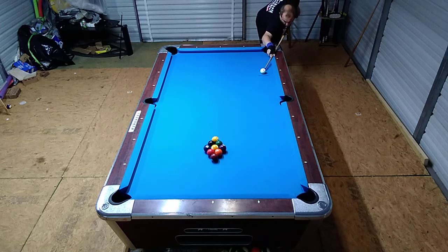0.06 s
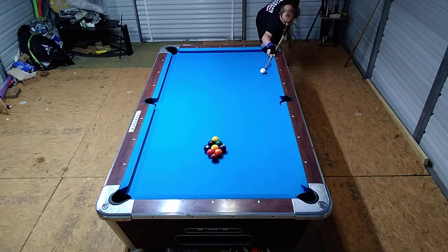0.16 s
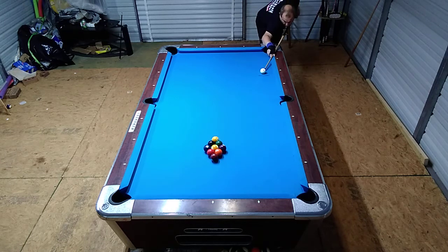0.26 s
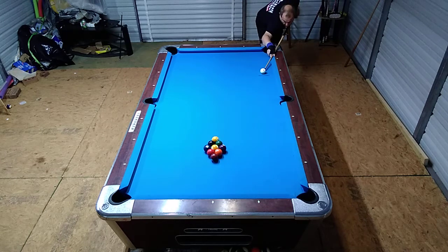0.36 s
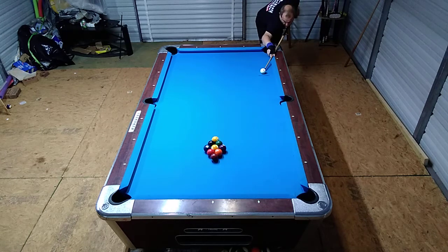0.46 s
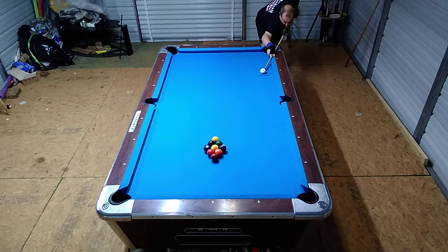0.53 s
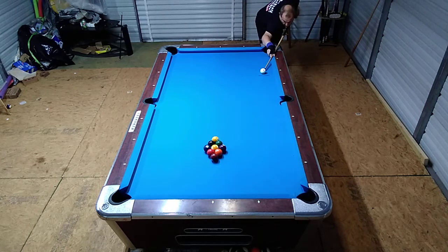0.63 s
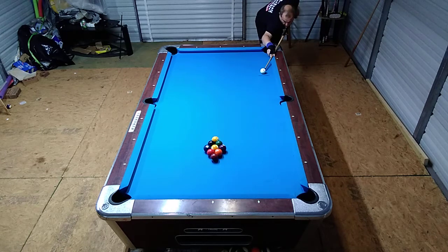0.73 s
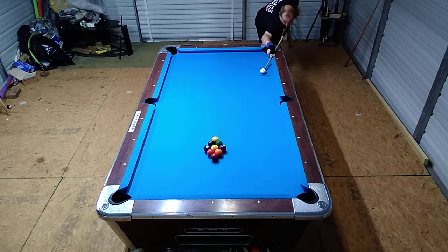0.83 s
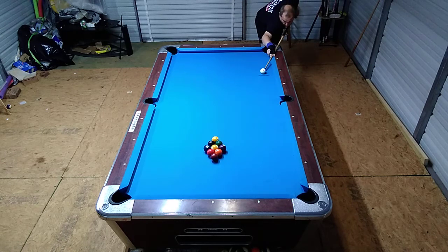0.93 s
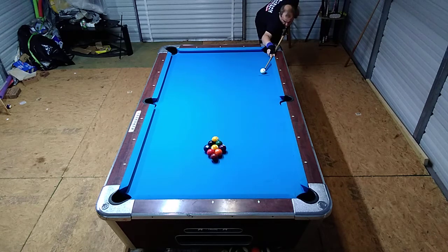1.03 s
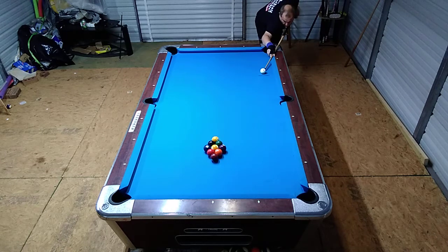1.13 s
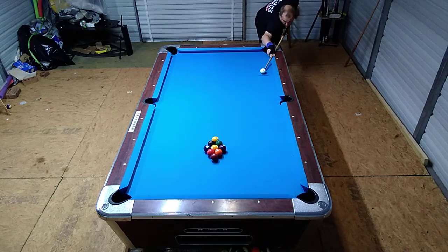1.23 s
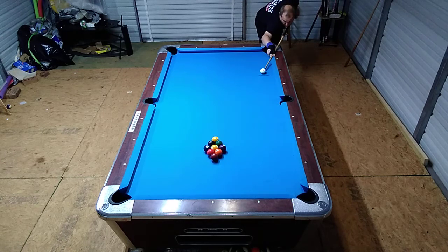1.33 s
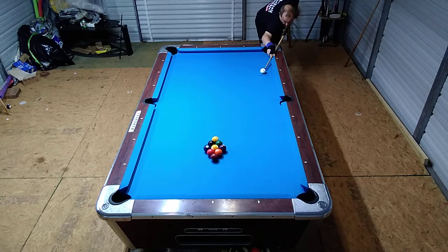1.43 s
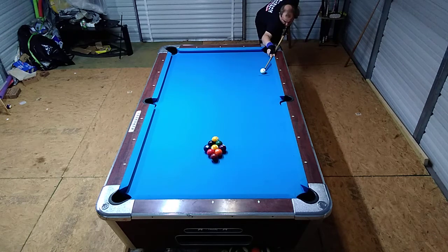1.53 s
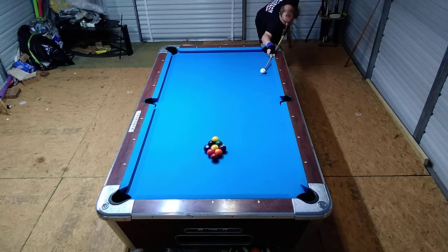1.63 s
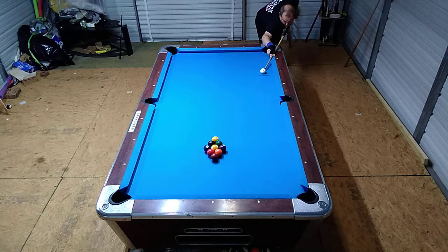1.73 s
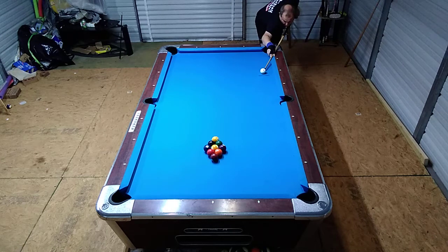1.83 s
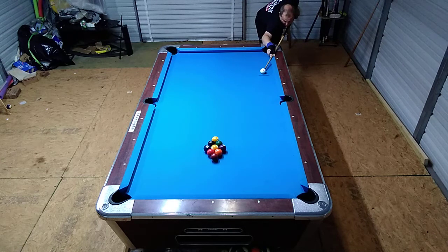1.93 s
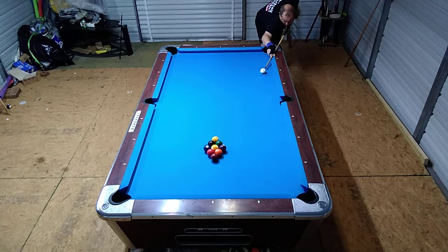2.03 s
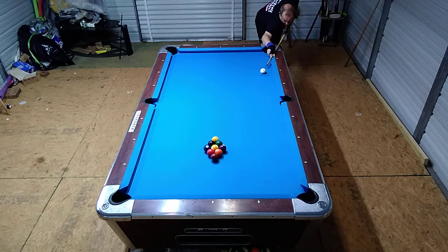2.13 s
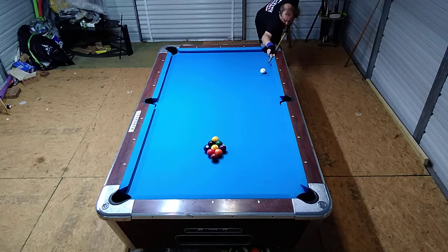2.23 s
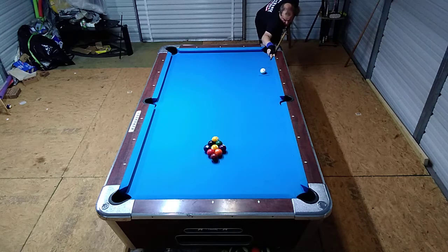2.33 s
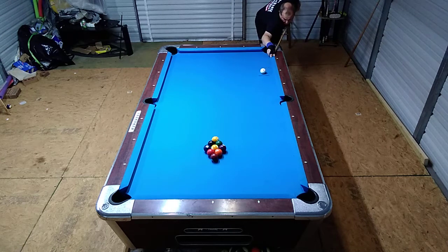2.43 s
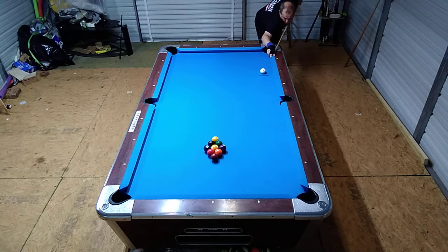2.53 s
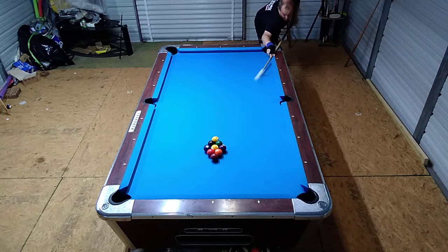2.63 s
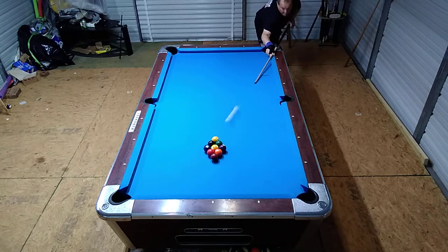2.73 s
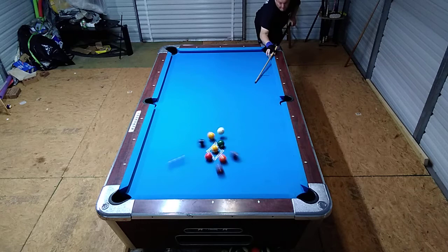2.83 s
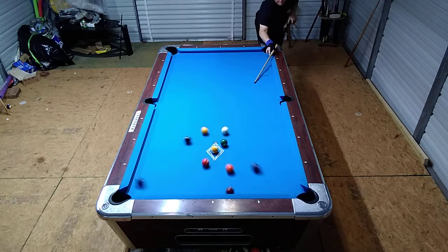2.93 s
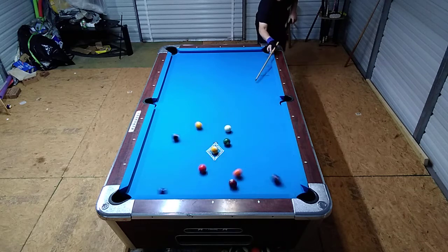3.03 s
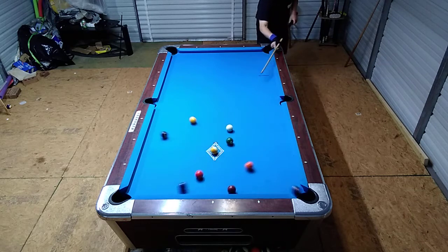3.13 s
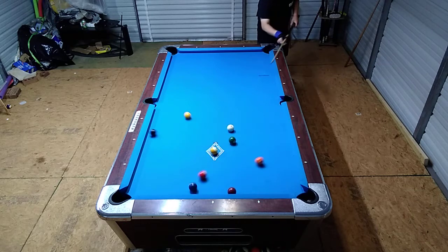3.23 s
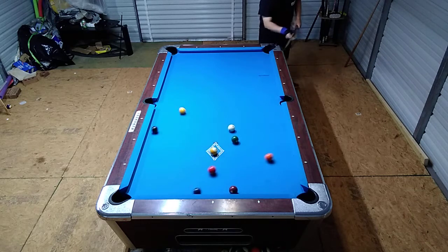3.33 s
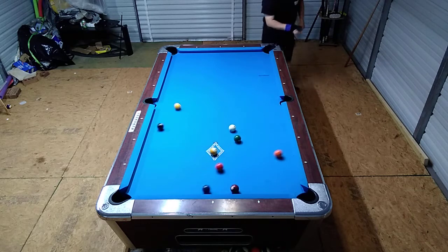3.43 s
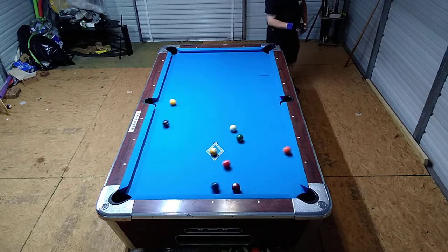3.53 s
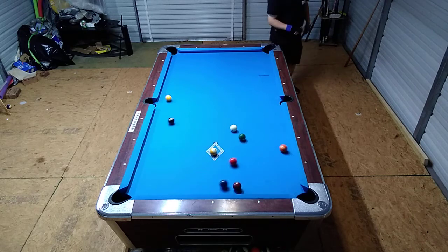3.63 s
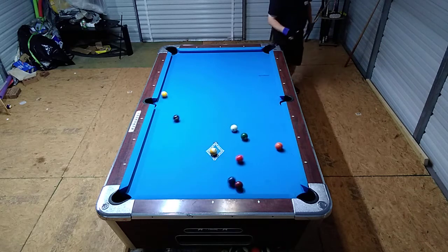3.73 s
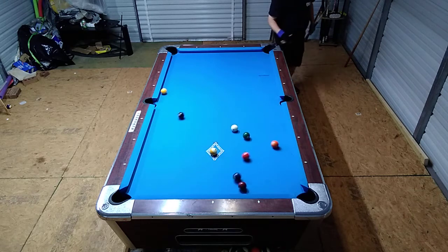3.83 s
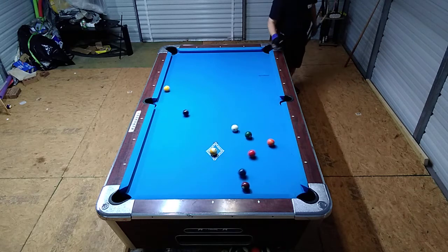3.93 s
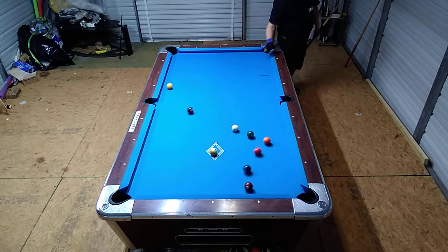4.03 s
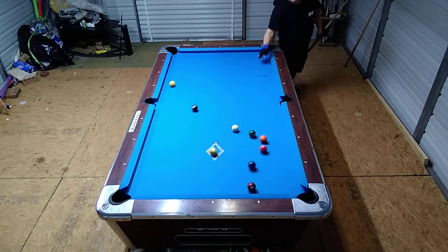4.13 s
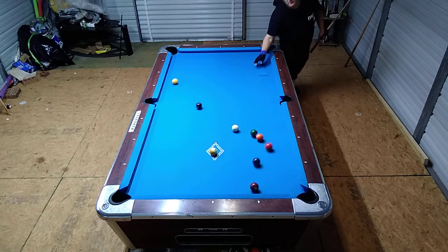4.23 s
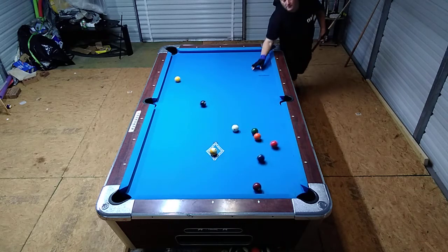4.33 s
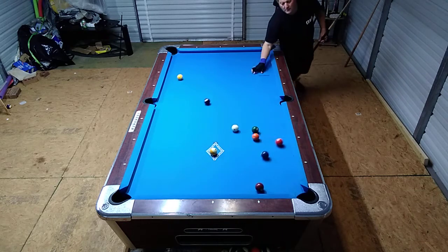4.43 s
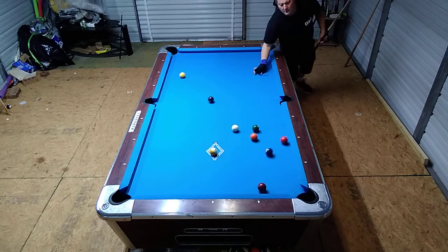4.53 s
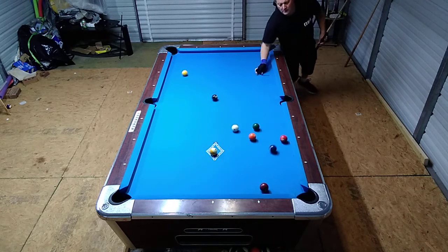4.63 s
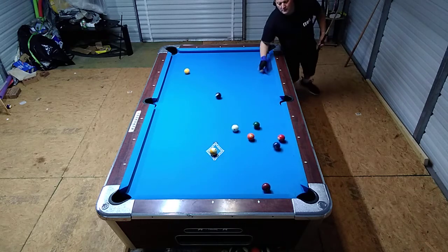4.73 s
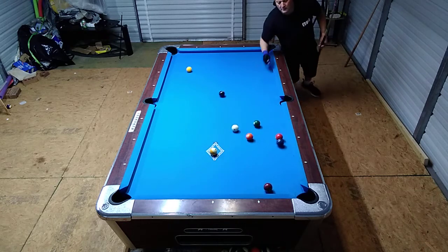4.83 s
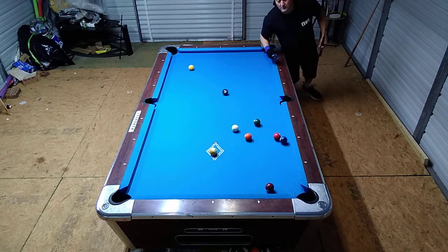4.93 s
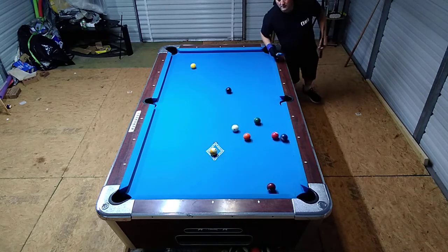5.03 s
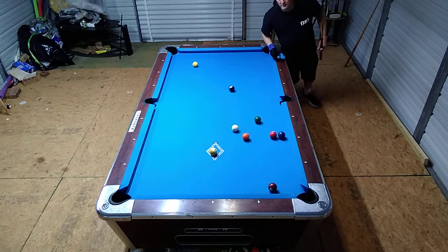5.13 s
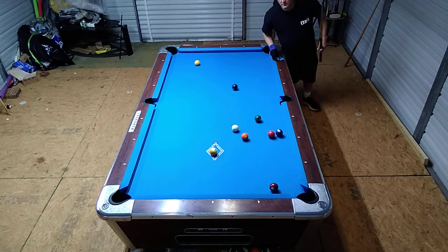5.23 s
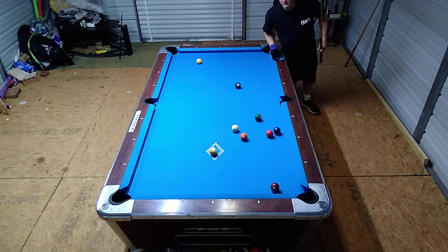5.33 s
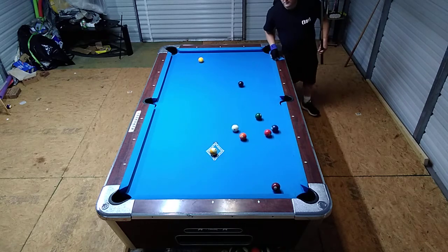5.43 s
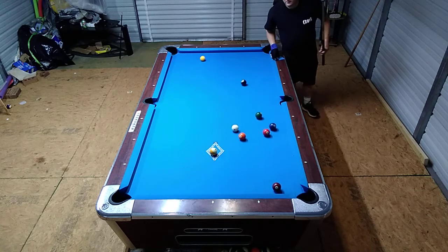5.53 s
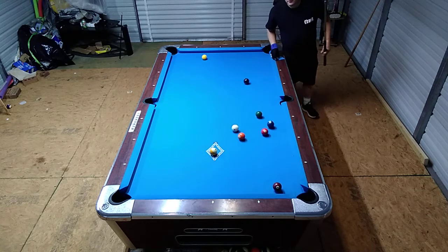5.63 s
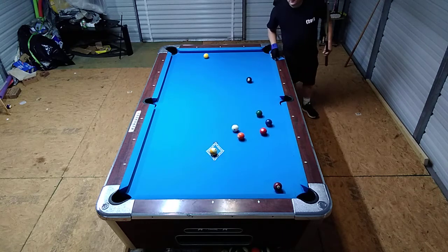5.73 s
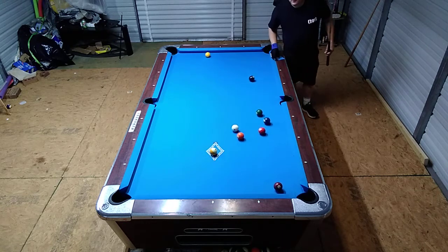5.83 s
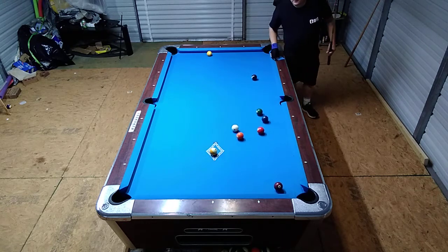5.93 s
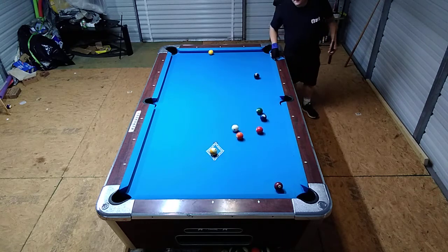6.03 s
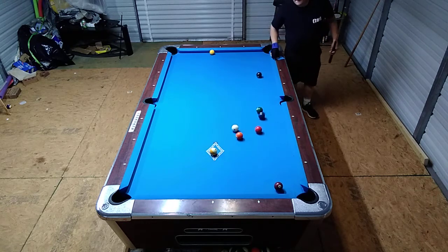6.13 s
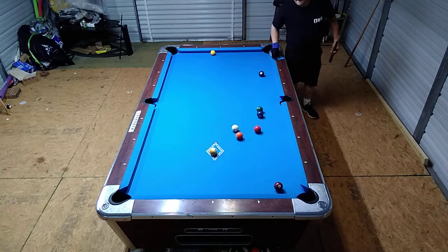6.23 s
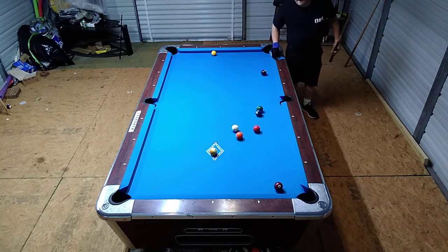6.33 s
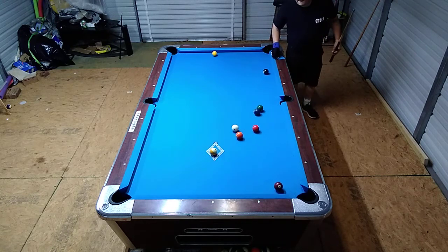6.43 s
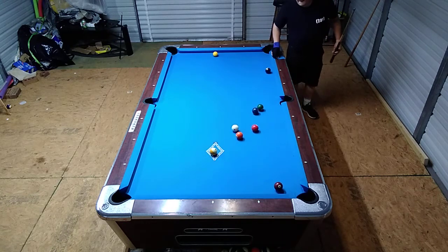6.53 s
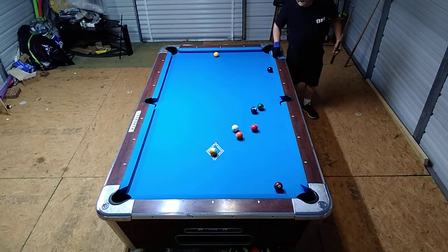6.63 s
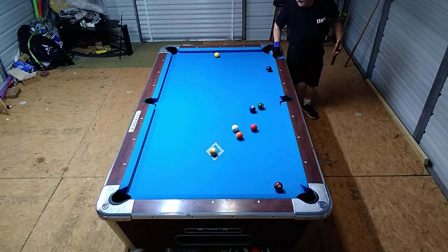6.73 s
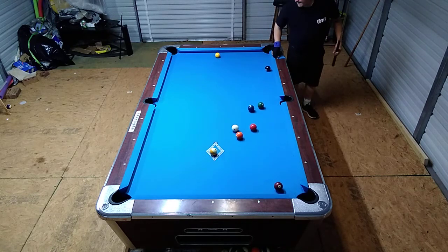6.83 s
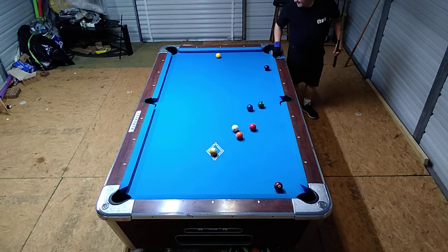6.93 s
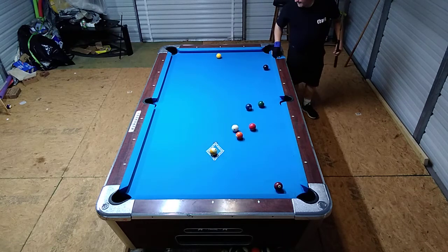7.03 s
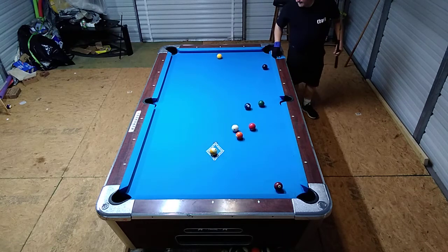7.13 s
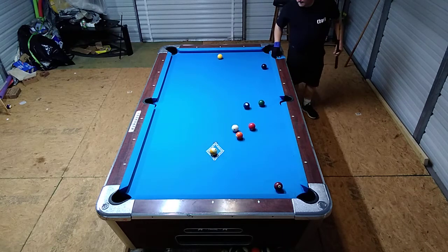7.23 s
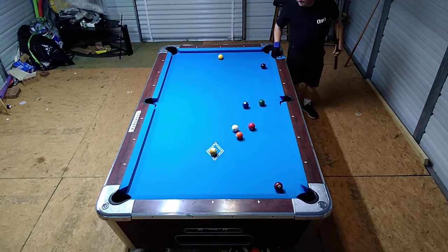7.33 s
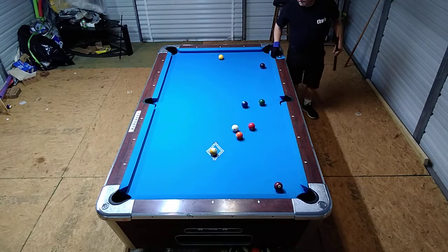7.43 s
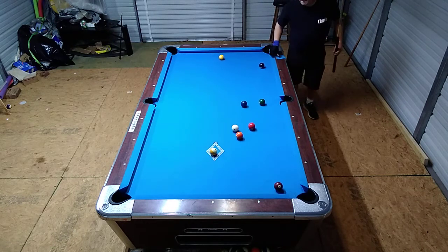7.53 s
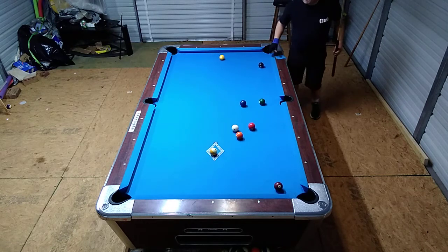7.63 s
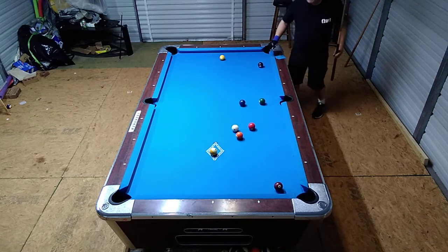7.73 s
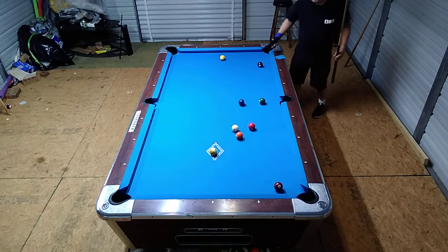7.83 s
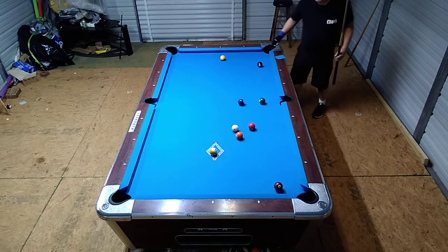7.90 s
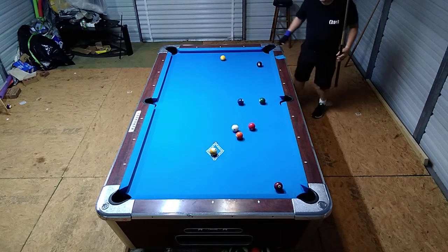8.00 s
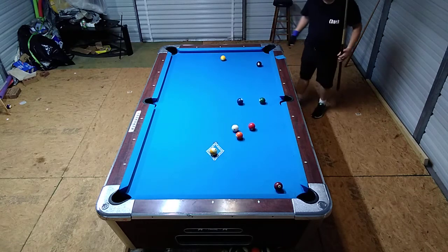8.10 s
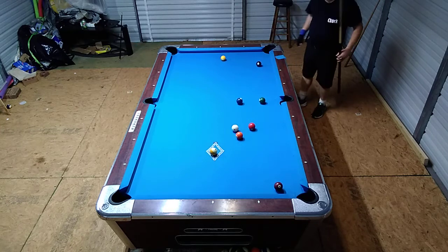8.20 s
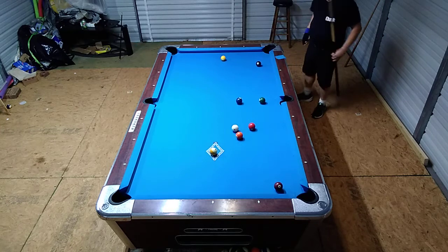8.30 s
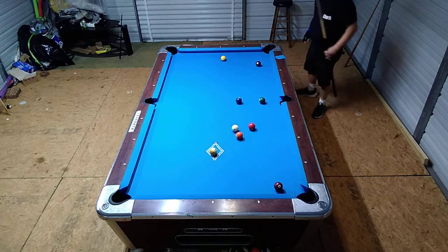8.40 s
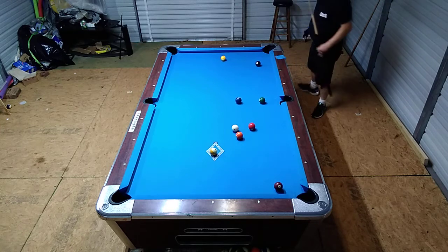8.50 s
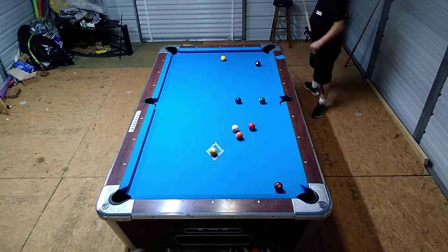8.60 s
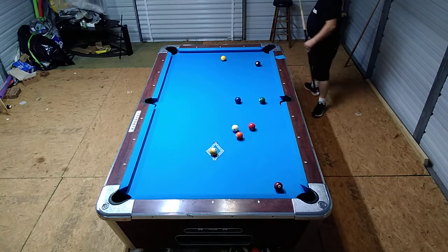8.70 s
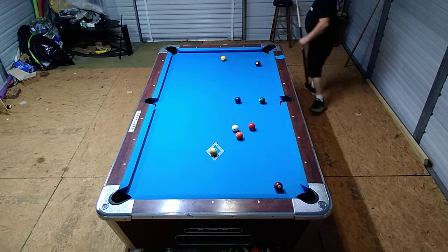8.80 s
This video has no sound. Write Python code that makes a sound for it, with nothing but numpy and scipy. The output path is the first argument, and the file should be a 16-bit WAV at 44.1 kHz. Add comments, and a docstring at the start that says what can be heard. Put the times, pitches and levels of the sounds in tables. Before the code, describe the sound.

A sharp cue strike sets off a loud burst of clacking pool balls, followed by cushion thuds and a metallic pocket hit. The sunken ball rolls and knocks through the inside of the table, then clanks against other balls in the tray, and the player takes a few soft steps. The microphone picks up the short echo of a small room, with low electrical hum and a very faint cricket underneath.

```python
"""Pool balls in a break shot on a coin-operated table, in a small, hard-walled room. The cue cracks, the
cue ball smashes the rack; balls click together, thump the cushions and slow on the cloth. A pocketed
ball rumbles down the hollow return channel, knocks at each turn and clanks into the balls in the tray.
The player's clothes rustle and he takes a few steps. Mains hum and a faint cricket lie underneath."""
import sys
import numpy as np
from scipy import signal
from scipy.fft import rfft, irfft
from scipy.io import wavfile

SR = 44100
rng = np.random.default_rng(int(sys.argv[2]) if len(sys.argv) > 2 else 0)


def wrap_up_sound(samples):
    """Save the sound to the file named by the first command line argument, as 16-bit audio."""
    columns = np.atleast_2d(samples).T
    # keep every value between -1 and 1, then stretch to whole-number steps
    tamed = np.clip(columns, -1, 1)
    steps = np.round(tamed * 32767).astype(np.int16)
    wavfile.write(sys.argv[1], SR, steps)


N = 390726
SPAN = 32768  # samples per impulse response
T = np.arange(SPAN) / SR
TIME = np.arange(N) / SR
LN_1000 = np.log(1000)

# room decay: (frequency [Hz], t60 [s])
ROOM_DECAY = [(60, 0.37), (200, 0.74), (450, 0.73), (1000, 0.47), (2500, 0.49), (6000, 0.5), (15000, 0.32)]
# slate, lamp and ceiling reflections: (left delay [ms], right delay [ms], relative gain)
REFLECTIONS = [(.6, .45, 0.61), (2.5, 2.5, 0.67), (3.1, 3.1, 0.26), (7.2, 7.5, 0.24)]
# mains hum: (frequency [Hz], level [dB])
HUM_PARTIALS = [(59.2, -72), (123.8, -66.5), (183.0, -77.5), (247.6, -83), (430.7, -93), (489.9, -84.5),
                (554.5, -84), (613.7, -88), (678.3, -87)]
# cricket: (time [s], strokes [count], relative level [dB])
CRICKET_CHIRPS = [(0.0, 2, -81), (0.586, 2, -80), (.765, 2, -82), (.91, 2, -76), (4.637, 6, -69.5),
                  (5.217, 7, -66), (6.309, 2, -72)]
# rubbing fabric: (start [s], length [s], level [dB])
GLOVE_SLIDES = [(.57, .27, -73.5), (2.623, 0.27, -70)]  # cue over the bridge hand: practice stroke, shot
CLOTHES_RUSTLES = [(3.6, 0.32, -66), (4.35, 0.55, -69.5), (7.55, 0.28, -74.5)]  # player straightens up, walks
# blows on wood: (time [s], level [dB], contact corner [Hz], relative boom [dB], relative rattle [dB])
TABLE_KNOCKS = [(2.7485, -24.5, 1460, -12, -44), (2.8430, -24, 1336, -9, -21),
                (3.0300, -18.5, 825, -2.5, -18), (3.0450, -18.5, 1380, -11, -50),
                (3.0750, -23.5, 410, -6.5, -39), (3.3258, -17, 1250, -16, -19),
                (3.3920, -19, 1140, -5.5, -14), (3.4300, -26, 540, 0, -35), (3.9250, -44, 196, -5, -30),
                (4.0225, -31.5, 1100, -4, -37), (4.1230, -29, 1007, -3, -26), (4.2600, -36.5, 1000, 0, -28),
                (5.6030, -22.5, 882, -2, -39.5), (5.6360, -18, 906, -17.5, -36.5),
                (5.6930, -29, 804, 0, -24), (6.0225, -24.5, 1040, -8, -39), (7.1320, -20, 730, -11, -40.5),
                (7.1550, -24.5, 330, -4.5, -47), (7.1930, -24, 690, -22, -40),
                (7.3435, -33, 960, -5.5, -51)]  # ball on slate, cushion, pocket or channel
FOOTSTEPS = [(7.8090, -53, 130.6, 0, -18), (7.8780, -42.5, 1047, -5.5, -37), (7.9400, -50, 300, 4.5, -24.5),
             (8.1270, -48.5, 687, -5, -30), (8.1600, -41, 257, -7.5, -32), (8.7180, -54, 181, 8, -17.5),
             (8.8140, -54, 3540, -8, -3)]  # shoes on plywood; the rattle is their scuff
# ball on ball: (time [s], level [dB], relative direct sound [dB], relative snap [dB])
BALL_CLACKS = [(2.8961, -12, 1, -28), (2.8975, -17, 14, -26), (2.9101, -23, 6, -28), (2.9235, -32, 6, -30),
               (2.931, -17, 9, -28), (2.9348, -23, 10, -25), (2.9483, -22.5, 9, -27),
               (2.9650, -17.5, -3.5, -21), (3.0000, -22, -9, -26), (3.125, -23, 6, -14),
               (3.3033, -26.5, 0.5, -10), (3.8341, -49.5, 3, -10), (3.842, -47, 8, -37),
               (4.3915, -43.5, 6.5, -16.5), (6.466, -58.5, 5.5, -29)]
# ringing impacts: (time [s], level [dB])
POCKET_HITS = [(3.043, -28.5), (3.394, -34.5)]  # on the pocket's metal casting
TRAY_HITS = [(7.0870, -47), (7.1141, -44), (7.194, -31.5), (7.241, -35.5), (7.3443, -39)]  # on balls waiting in the tray
# sloping channel legs, relative levels:
# (start [s], end [s], full-speed roll [dB], bounce [dB], grit [dB], cabinet boom [dB])
CHANNEL_LEGS = [(3.448, 3.84, -66, -53.5, -0.5, 14.5), (4.137, 4.795, -47.5, -29.5, -22.5, -7),
                (4.85, 5.618, -40.5, -49, -16.5, -5.5), (6.06, 7.126, -39, -40.5, -13, -6.5),
                (7.2, 7.56, -52, -35, -13.5, -6)]

# modes: (frequency [Hz], relative level [dB], t60 [s])
SHAFT_MODES = [(1470, 5.5, 0.06), (1502, -6.5, .19), (2190, -10.5, 0.36), (2287, -12.5, 0.14),
               (3792, -13.5, .36)]
CABINET_MODES = [(59.5, -3, 0.42), (78, -8.5, 0.27), (92.5, 6.5, 0.24), (99.24, -4, 0.2887)]  # cabinet and slate
PANEL_MODES = [(156.95, -1.5, 0.41), (194, 2, 0.28), (246.7, -3, .16), (310, -3.5, 0.17), (348.4, 1, .18),
               (397.5, -3, 0.33), (453, 0.5, 0.086), (491, -0.5, 0.16), (569, 0, 0.18), (890, -4.5, 0.055),
               (1224, -2.5, .1), (1493, -1, .05), (2016, -4.5, 0.045)]  # rails and return channel
CASTING_MODES = [(1322, 4.5, 0.11), (1340, -20, 1.3), (2130, -12, .3), (2640, -18, 0.51), (2846, -23, 1.2)]
BALL_TRAY_MODES = [(1170, 2, 0.19), (1332, 0, 0.24), (1495, 0, 0.16), (1890, 6.5, 0.076), (2043, -1.5, .09),
                   (2440, -13, 0.12), (2920, -11, 0.11), (3620, -4, 0.055), (3980, -5.5, 0.033)]

# spectra: (frequency [Hz], relative level [dB])
AIR_COLOUR = [(25, -17.5), (60, -3.5), (120, -5), (170, -16), (290, -19), (550, -23), (900, -27.5),
              (2500, -31), (5000, -32.5), (8000, -44), (15500, -30.5)]
GLOVE_COLOUR = [(200, -8.5), (450, 0), (1000, -9), (2200, -4.5), (3300, -7.5), (5500, -8.5), (8000, -14.5),
                (15000, -26.5)]
CUE_TIP_COLOUR = [(100, -14.5), (500, -6), (1200, 5.5), (1550, -2), (1850, -26.5), (2500, 5), (3300, -8.5),
                  (4500, -24), (15000, -35)]
SHAFT_SLAP_COLOUR = [(500, -21.5), (1900, -21.5), (2600, 2.5), (4300, 0), (6000, -2.5), (8500, -3),
                     (11000, 1), (13000, -4), (15500, -8)]
TABLE_COLOUR = [(40, -29), (110, -2), (180, -2), (450, -1.5), (750, -5), (1300, -5), (2500, -6),
                (5000, -14), (15000, -27.5)]
RATTLE_COLOUR = [(500, -24.5), (2000, -1.5), (4000, 5), (6800, -7.5), (10000, -2.5), (12500, -2.5),
                 (15500, -11)]
CLACK_COLOUR = [(150, -28.5), (500, -11), (950, -5.5), (1300, -0.5), (1800, 0), (2700, 3.5), (3300, -2.5),
                (3900, -6.5), (4700, -10.5), (7000, -16), (15000, -12)]
SNAP_COLOUR = [(3000, -29), (7000, -15.5), (10500, -4.5), (13000, -2.5), (15000, 4)]
SLATE_ROLL_COLOUR = [(50, -3.5), (110, -2.5), (200, -10), (330, -2), (420, -11.5), (600, -23),
                     (1200, -26.5), (3000, -50.5)]
CHANNEL_ROLL_COLOUR = [(90, -16), (135, -8.5), (184, 1), (290, 0), (390, -6), (520, -10.5), (740, -29.5),
                       (1200, -30.5), (3000, -57)]
GRIT_COLOUR = [(300, -19), (600, 5.5), (1000, 0.5), (1500, -9), (2500, -20.5), (5000, -33)]
CLOTHES_COLOUR = [(500, -17), (2000, -2), (5000, -1.5), (8000, -9), (15000, -5)]
FLOOR_COLOUR = [(45, -25), (90, 2), (180, -3.5), (450, -3.5), (1000, -8), (1450, -10.5), (1900, -18),
                (3200, -10), (6000, -20.5), (15000, -36.5)]


def amp(db):
    """Decibels to gain."""
    return 10 ** (np.asarray(db) / 20)


def along(points, hz):
    """Interpolate (frequency [Hz], value) on a log-frequency axis."""
    points_hz, values = np.transpose(points)
    return np.interp(np.log(np.maximum(hz, 1)), np.log(points_hz), values)


def unit(x):
    """Scale to unit mean energy per channel."""
    return x / np.sqrt(np.sum(x ** 2) / len(np.atleast_2d(x)))


def burst(x, db):
    """Scale to the energy of 50 ms at this level."""
    return unit(x) * amp(db) * np.sqrt(SR / 20)


def level(x, db):
    """Set the rms level."""
    return x * amp(db) / np.sqrt(np.mean(x ** 2))


def through(x, response):
    """Convolve, keeping the length of x."""
    x, response = (np.atleast_2d(v).astype(np.float32) for v in (x, response))
    return signal.fftconvolve(x, response, axes=1)[:, :x.shape[-1]].astype(float)


def add(out, time_s, x):
    """Mix x in at time_s."""
    start = max(int(time_s * SR), 0)
    out[:, start:start + x.shape[-1]] += x[..., :N - start]


def pulse(colour, corner_hz=np.inf, order=2):
    """Minimum-phase contact pulse; a longer contact has a lower corner."""
    hz = np.fft.rfftfreq(4096, 1 / SR)
    magnitude = amp(along(colour, hz)) / np.hypot(1, (hz / corner_hz) ** order)
    cepstrum = irfft(np.log(magnitude))
    fold = 1 + np.sign(len(cepstrum) / 2 - np.arange(len(cepstrum)))
    fold[0] = 1
    return unit(irfft(np.exp(rfft(cepstrum * fold))))


def ring(modes, scatter_db=0):
    """Damped modes; scatter varies their shares of the energy per blow."""
    hz, db, t60_s = np.transpose(modes)[:, :, None]
    gains = amp(db[:, 0] + scatter_db * rng.standard_normal(len(modes)))
    decay = np.exp(-np.minimum(LN_1000 * T / t60_s, 20))
    return unit(gains @ (np.sin(2 * np.pi * hz * T) * decay))


def chatter(decay_s):
    """Dying flurry of tiny contacts."""
    return unit(rng.standard_normal(SPAN) * np.exp(-np.minimum(T / decay_s, 20)))


def room(build_s=0.002, coherent_hz=520):
    """Diffuse echoes: treble dies first, bass is alike in both ears."""
    hz = np.fft.rfftfreq(SPAN, 1 / SR)
    mid, side = rfft(rng.standard_normal((2, SPAN), dtype=np.float32))
    coherence = 1 / (1 + (hz / coherent_hz) ** 2)
    mid, side = mid * np.sqrt(1 + coherence), side * np.sqrt(1 - coherence)
    ears = np.array([mid + side, mid - side])
    centres_hz, t60s_s = np.transpose(ROOM_DECAY)
    band_index = along(np.c_[centres_hz, np.arange(len(centres_hz))], hz)
    tail = np.zeros((2, SPAN))
    for k, t60_s in enumerate(t60s_s):
        band = irfft(ears * np.maximum(1 - abs(band_index - k), 0))
        tail += band * np.exp(-LN_1000 * T / t60_s)
    return unit(tail * (1 - np.exp(-T / build_s)))


def space(direct_db):
    """Direct path, near reflections and diffuse room."""
    near = np.zeros((2, SPAN))
    near[:, 0] = 1
    for left_ms, right_ms, gain in REFLECTIONS:
        near[0, int(left_ms * SR / 1000)] += gain
        near[1, int(right_ms * SR / 1000)] += gain
    return amp(direct_db) * unit(near) / 2 + room()


def background(air_db=-71.5, hiss_db=-83):
    """Mains hum, soft room noise, thin hiss."""
    hum = sum(amp(db) * np.sin(2 * np.pi * (hz * TIME + rng.random())) for hz, db in HUM_PARTIALS)
    air = through(rng.standard_normal(N), through(room(), pulse(AIR_COLOUR)))
    return hum + level(air, air_db) + amp(hiss_db) * rng.standard_normal((2, N))


def cricket(glide_hz=(3400, 2980), stroke_s=0.016, period_s=0.033, swell_db=11):
    """Each wing stroke is a short falling tone; strokes grow louder through a chirp."""
    out = np.zeros((2, N))
    progress = np.linspace(0, 1, int(stroke_s * SR))
    for time_s, strokes, db in CRICKET_CHIRPS:
        for k, effort in enumerate(np.linspace(0, 1, strokes)):
            hz = np.interp(progress, [0, 1], glide_hz) * (1 + 0.008 * rng.standard_normal())
            stroke = np.sin(np.pi * progress) * np.sin(2 * np.pi * np.cumsum(hz) / SR)
            add(out, time_s + k * period_s, burst(stroke, db - swell_db * (1 - effort) ** 2))
    return 0.6 * out + 0.65 * through(out, room())


def fabric_rubs(rows, colour):
    """Rubbed fabric hisses, swelling and fading with the speed of the movement."""
    swell = np.zeros(N)
    for start_s, length_s, db in rows:
        swell += amp(db) * np.sin(np.pi * np.clip((TIME - start_s) / length_s, 0, 1))
    return swell * level(through(rng.standard_normal((2, N)), pulse(colour)), 0)


def cue_strike(shaft_rise_s=0.0036):
    """The tip strikes and rings the shaft; 6 ms later the shaft slaps with a bright crack."""
    out = np.zeros((2, N))
    tip = through(space(direct_db=-10.5), pulse(CUE_TIP_COLOUR))
    add(out, 2.7483, burst(tip, db=-24))
    shaft = ring(SHAFT_MODES) * (1 - np.exp(-T / shaft_rise_s))
    add(out, 2.7485, burst(shaft, db=-24.5) + burst(through(room(), shaft), db=-24.5))
    slap = through(chatter(decay_s=0.00073), pulse(SHAFT_SLAP_COLOUR))
    add(out, 2.7542, burst(through(space(direct_db=-8), slap), db=-17.5))
    return out


def wood_blows(rows, colour, ring_db, boom_rise_s, rattle_s, direct_db):
    """Ball or shoe on wood: thud with panel modes, late boom, brief bright rattle."""
    out = np.zeros((2, N))
    for time_s, db, corner_hz, boom_db, rattle_db in rows:
        # soft contacts barely excite the upper modes
        excited = [(hz, mode_db - 10 * np.log10(1 + (hz / corner_hz) ** 4), t60_s)
                   for hz, mode_db, t60_s in PANEL_MODES]
        thud = amp(ring_db) * ring(excited, scatter_db=11)
        contact = pulse(colour, corner_hz)
        thud[:len(contact)] += contact
        rattle = amp(rattle_db) * unit(through(chatter(rattle_s), pulse(RATTLE_COLOUR)))
        boom = ring(CABINET_MODES, scatter_db=2.5) * (1 - np.exp(-T / boom_rise_s)) ** 2
        knock = through(unit(thud) + rattle, space(direct_db))
        add(out, time_s, burst(knock, db) + burst(boom, db + boom_db))
    return out


def ball_clacks(ref_corner_hz=3550, ref_db=-24, hardening_power=0.14):
    """Resin balls barely ring: one pulse with a bright snap; harder hits are shorter."""
    out = np.zeros((2, N))
    for time_s, db, direct_db, snap_db in BALL_CLACKS:
        corner_hz = ref_corner_hz * amp(db - ref_db) ** hardening_power
        click = pulse(CLACK_COLOUR, corner_hz, order=5) + amp(snap_db) * pulse(SNAP_COLOUR)
        add(out, time_s, burst(through(space(direct_db), click), db))
    return out


def bumps(response, spread_db=4, rate_per_s=600):
    """A rolling ball meets small random bumps; each sounds the body under it."""
    size, scatter = rng.standard_normal((2, N), dtype=np.float32)
    hits = (rng.random(N, dtype=np.float32) < rate_per_s / SR) * size * amp(spread_db * scatter)
    return level(through(hits, through(room(), response)), 0)


def cloth_roll(break_s=2.9, skid_s=0.39, roll_s=7.5, skid_db=-35.5, rumble_db=-61, hiss_db=-75):
    """Balls skid, then roll: the slate rumbles softly, the cloth hisses less as they slow."""
    age_s = np.maximum(TIME - break_s, 0)
    speed = np.maximum(1 - age_s / roll_s, 0)
    skid = amp(skid_db) * np.exp(-age_s / skid_s)
    rumble = np.hypot(skid, amp(rumble_db)) * bumps(pulse(SLATE_ROLL_COLOUR))
    hiss = amp(hiss_db) * speed ** 0.92 * rng.standard_normal((2, N))
    return (TIME > break_s) * (rumble + hiss)


def metal_clanks(rows, modes, detune, ring_db=3.5, snap_db=-39):
    """A ball's click rings metal; shifting balls detune it from blow to blow."""
    out = np.zeros((2, N))
    click = pulse(CLACK_COLOUR, corner_hz=3140, order=5) + amp(snap_db) * pulse(SNAP_COLOUR)
    for time_s, db in rows:
        loaded = [(hz * (1 + detune * rng.standard_normal()), mode_db, t60_s)
                  for hz, mode_db, t60_s in modes]
        clank = amp(ring_db) * ring(loaded)
        clank[:len(click)] += click
        add(out, time_s, burst(through(clank, space(direct_db=0)), db))
    return out


def return_channel(attack_s=0.038, release_s=0.14, entry_speed=0.54, gather_s=0.1, settle_s=0.3):
    """The ball drops onto each hollow leg, bounces, settles and speeds up; speed brings out grit."""
    roll_gain, grit_gain, boom_gain = np.zeros((3, N))
    for start_s, end_s, roll_db, bounce_db, grit_db, boom_db in CHANNEL_LEGS:
        age_s = np.maximum(TIME - start_s, 0)
        on_leg = np.minimum(age_s / attack_s, 1) * np.clip(1 - (TIME - end_s) / release_s, 0, 1)
        speed = 1 - (1 - entry_speed) * np.exp(-age_s / gather_s)  # 1 = full speed
        bounce = amp(bounce_db) * np.exp(-age_s / settle_s)
        force = on_leg * np.hypot(amp(roll_db) * speed, bounce)
        roll_gain += force
        grit_gain += force * speed * amp(grit_db)
        boom_gain += force * amp(boom_db)
    rumble = amp(-1.5) * bumps(pulse(CHANNEL_ROLL_COLOUR))
    panels = amp(-6) * bumps(ring([(hz, db, t60_s) for hz, db, t60_s in PANEL_MODES if hz < 560]))
    hiss = amp(-41.5) * rng.standard_normal((2, N))
    boom = bumps(ring(CABINET_MODES[1:]) + amp(-8) * ring(CABINET_MODES[:1]))
    grit = bumps(pulse(GRIT_COLOUR))
    return roll_gain * (rumble + panels + hiss) + boom_gain * boom + grit_gain * grit


def scene():
    """Sum of table, player, balls and room; stereo."""
    pocket = metal_clanks(POCKET_HITS, CASTING_MODES, detune=0.002)
    tray = metal_clanks(TRAY_HITS, BALL_TRAY_MODES, detune=0.0257)
    knocks = wood_blows(TABLE_KNOCKS, TABLE_COLOUR,
                        ring_db=-2.5, boom_rise_s=0.057, rattle_s=0.007, direct_db=-5.5)
    steps = wood_blows(FOOTSTEPS, FLOOR_COLOUR,
                       ring_db=-18, boom_rise_s=0.012, rattle_s=0.017, direct_db=-11)
    glove = fabric_rubs(GLOVE_SLIDES, GLOVE_COLOUR)
    clothes = fabric_rubs(CLOTHES_RUSTLES, CLOTHES_COLOUR)
    player = glove + cue_strike() + clothes + steps
    balls = knocks + ball_clacks() + cloth_roll() + pocket + return_channel() + tray
    return player + balls + cricket() + background()


def record(dry, low_hz=42, top_hz=15950, max_duck_db=3.5, release_db_per_s=60):
    """Bass cut, ducking after overload, soft clip, top cut."""
    x = signal.sosfilt(signal.butter(3, low_hz, "highpass", fs=SR, output="sos"), dry)
    over_db = np.clip(20 * np.log10(np.abs(x).max(axis=0) + 1e-9), 0, max_duck_db)
    recovery_db = release_db_per_s * TIME
    ducked = x * amp(recovery_db - np.maximum.accumulate(over_db + recovery_db))
    rounded = ducked / (1 + ducked ** 6) ** (1 / 6)
    return signal.sosfilt(signal.ellip(10, 0.1, 70, top_hz, fs=SR, output="sos"), rounded)


dry = scene()
out = record(dry)
wrap_up_sound(out)
```